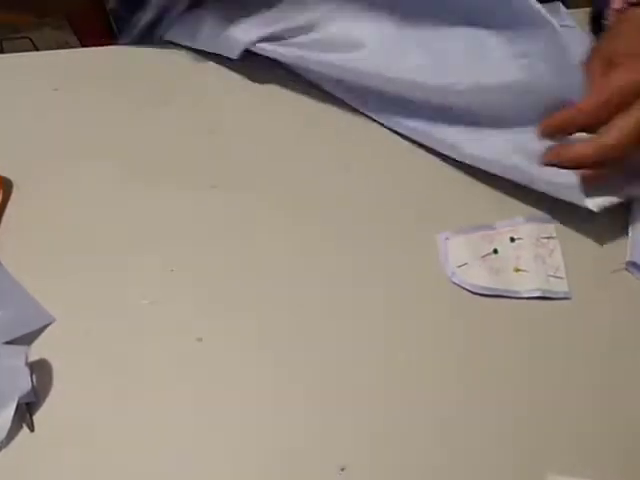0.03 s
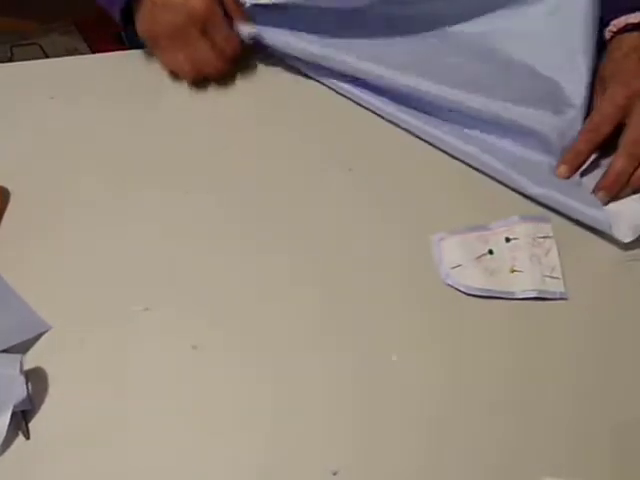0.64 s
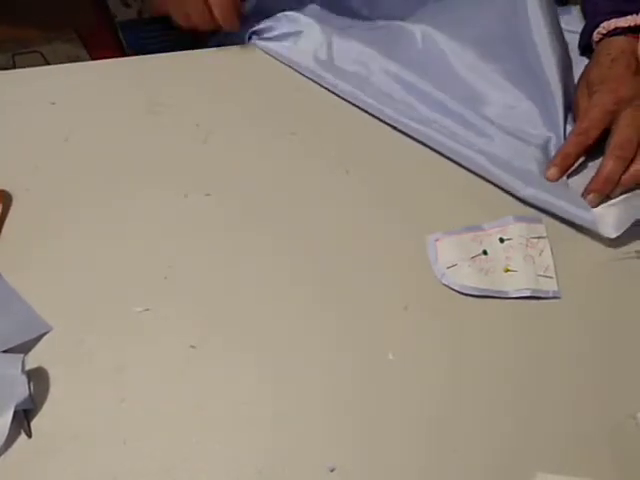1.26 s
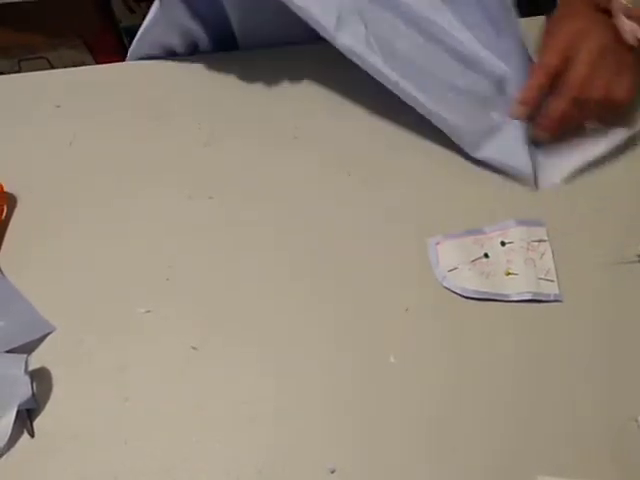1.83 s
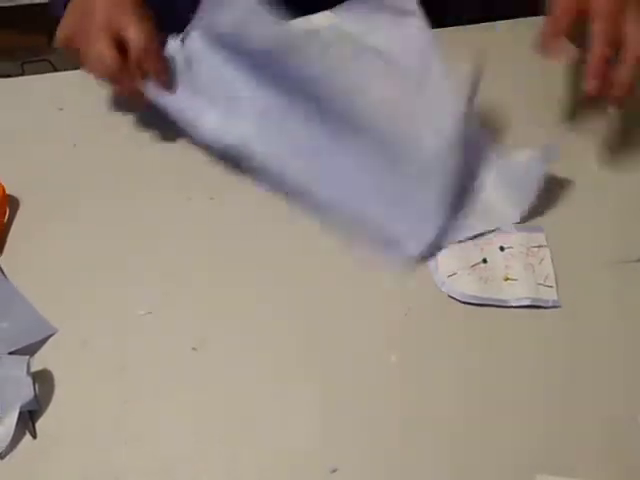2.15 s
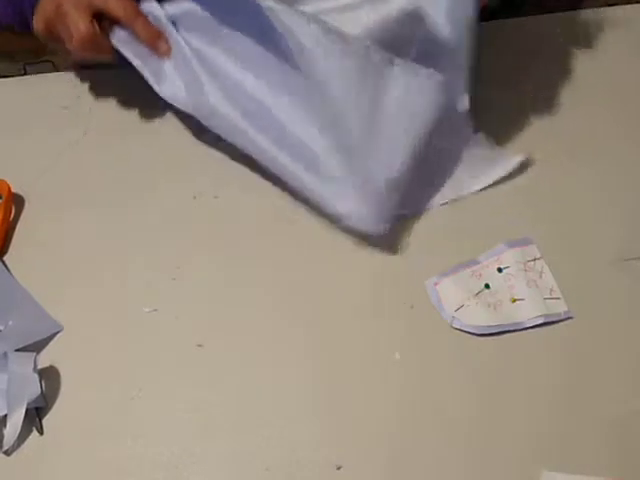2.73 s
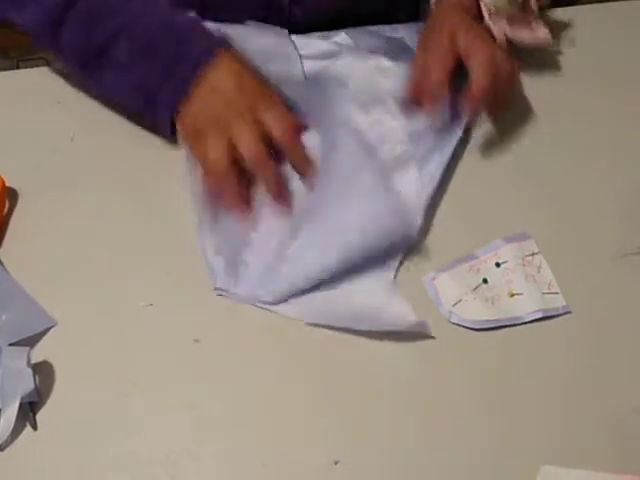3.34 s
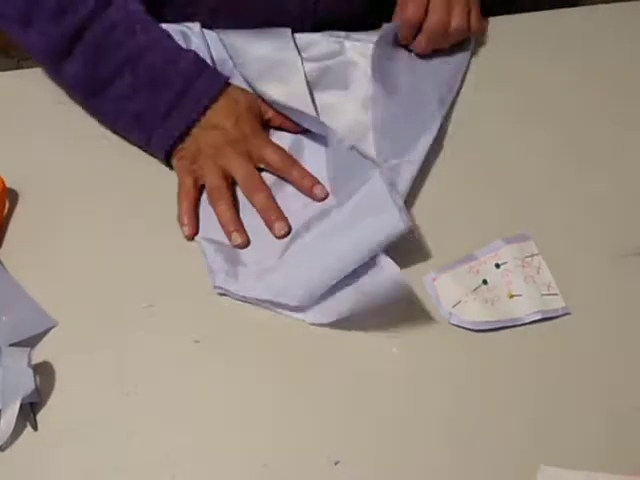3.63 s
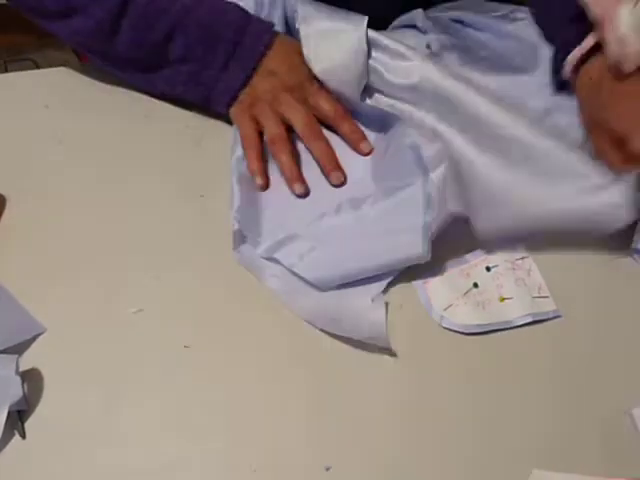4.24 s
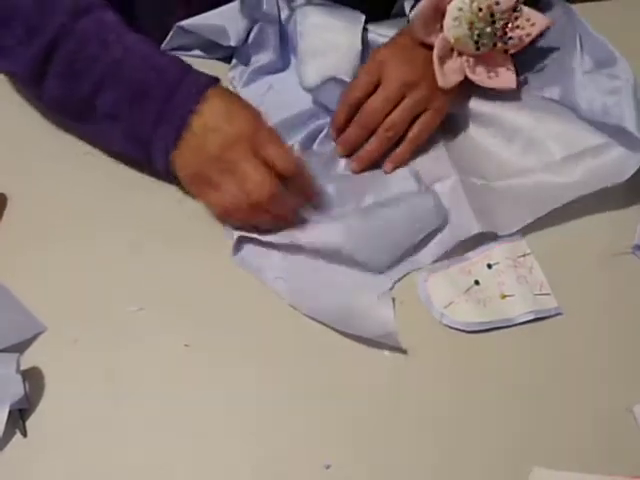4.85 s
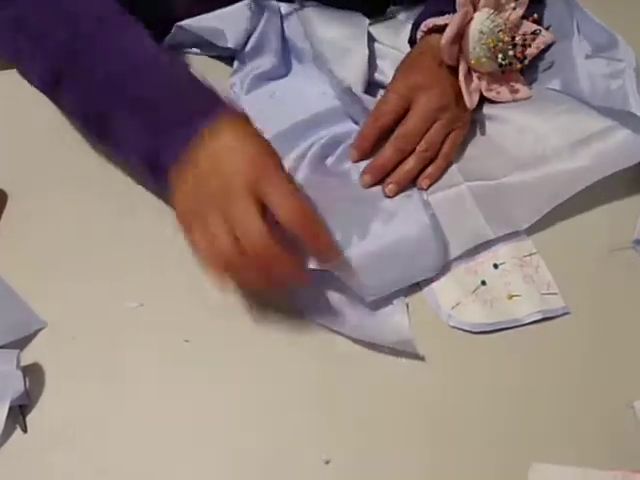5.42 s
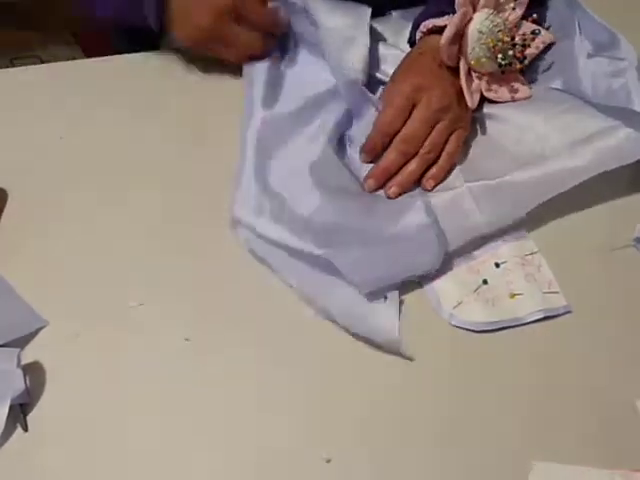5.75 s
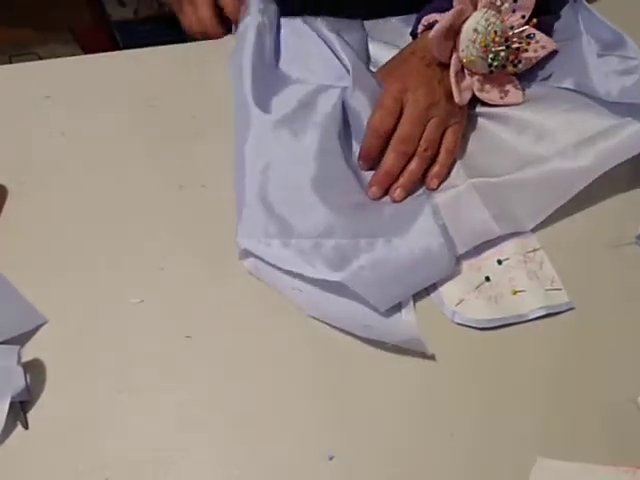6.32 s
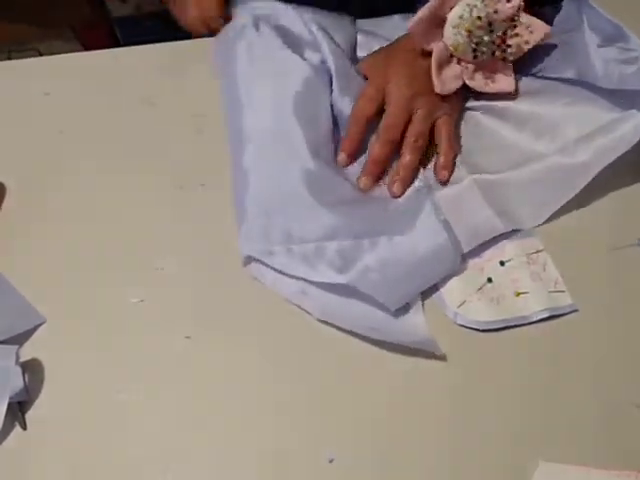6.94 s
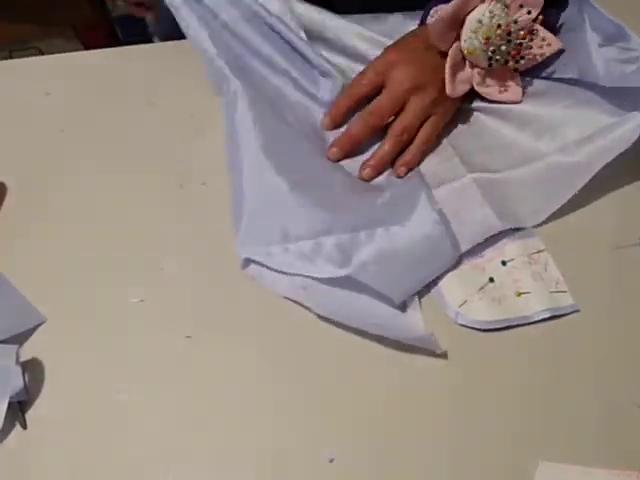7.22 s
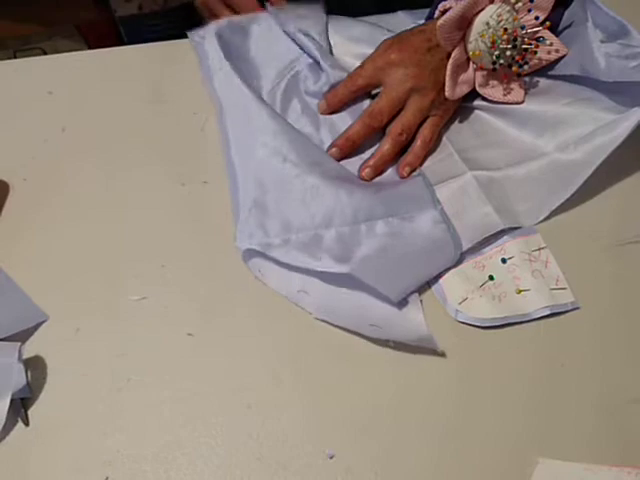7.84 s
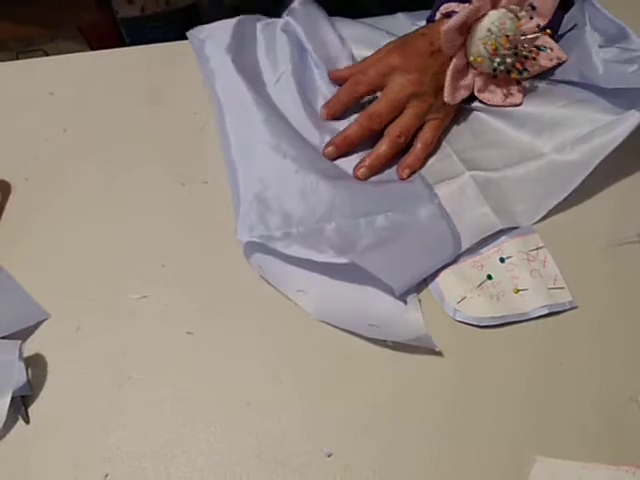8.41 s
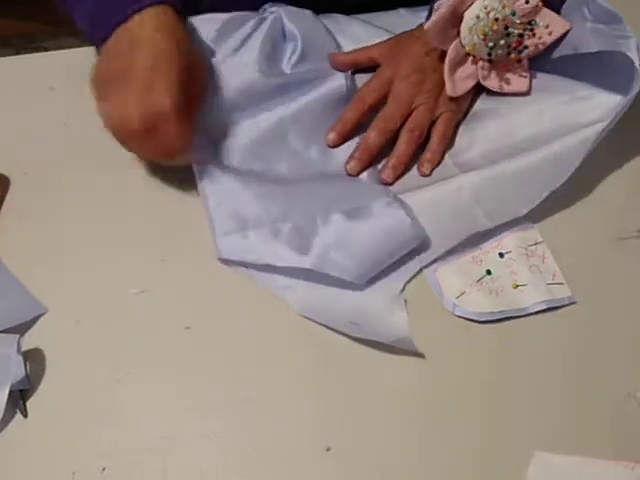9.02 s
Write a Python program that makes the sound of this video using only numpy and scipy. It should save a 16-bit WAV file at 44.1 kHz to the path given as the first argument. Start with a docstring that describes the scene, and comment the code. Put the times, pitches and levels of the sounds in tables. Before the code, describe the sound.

Close stereo microphones in a small, softly rumbling room pick up hands working thin satin on a table. Uneven swells of rustling, hissing and low rubbing run throughout. Early on, fingers knock the table and the cloth snaps crisply several times. Then flat hands thud down and a palm judders across the fabric. Further smoothing strokes follow, with lighter knocks, brief scrapes, tiny ticks and one more snap near the end.

```python
"""Thin satin is lifted, spread and smoothed by hand on a work table, over a small room's low rumble.
From the start, folds rustle, the sliding weave hisses and hands rub. Within a second, folds snap taut,
fingers knock the table into a brief ring, hollow scrapes pass and a flat hand thuds. From 1.4 s a caught
thread ticks now and then, and near 4.6 s a dragged palm judders. Strokes, snaps and knocks go on until
the end at 9 s. Two small microphones close by pick it all up."""
import sys
import numpy as np
from scipy import signal
from scipy.fft import rfft, irfft
from scipy.io import wavfile
from scipy.ndimage import uniform_filter1d

SR = 44100
rng = np.random.default_rng(int(sys.argv[2]) if len(sys.argv) > 2 else 0)


def transcribe(u):
    """Save the signal u as a 16-bit wav file named by the first command-line argument.

    u: samples, shape (n,) or (channels, n), limited to [-1, 1]; the rate is SR.
    q: integer samples, one column per channel.
    """
    v = np.clip(np.atleast_2d(u).T, -1, 1)
    q = np.round(v * 32767).astype(np.int16)
    wavfile.write(sys.argv[1], SR, q)


N = 399987
HZ = np.fft.rfftfreq(N, 1 / SR)
TIME = np.arange(N) / SR


def gain(db):
    """Turns decibels into a factor to multiply a sound by."""
    return 10 ** (np.asarray(db) / 20)


def evened(x):
    """Scales a signal to an average strength (rms) of 1."""
    return x / np.sqrt(np.mean(x ** 2) + 1e-20)


def look_up(points, hz):
    """Reads between the rows of a table, on a logarithmic frequency scale."""
    f, value = np.transpose(points)
    return np.interp(np.log(hz + 1), np.log(f + 1), value)


def add(mix, start, sound):
    """Mixes a sound in at a start time in seconds."""
    part = mix[..., max(round(start * SR), 0):][..., :sound.shape[-1]]
    part += sound[..., :part.shape[-1]]


def coloured(x, colour):
    """Gives a signal a colour (its mix of low and high), at strength 1."""
    return evened(irfft(rfft(x) * gain(look_up(colour, HZ)), N))


def noise(colour):
    """Steady noise of one colour, as a front and a side part."""
    return coloured(rng.standard_normal((2, N)), colour)


def pulse(hz, cycles):
    """A push that swells for the given number of cycles, then dies away."""
    age = np.arange(SR // 4) / SR * hz / cycles
    return age * np.exp(1 - age) * np.sin(2 * np.pi * age * cycles)


def scattered(sound, scatter_db, fade_s, side_db):
    """A blow bounces off nearby things; gives a front and a side part."""
    t = np.arange(SR // 4) / SR
    echo = rng.standard_normal((2, len(t))) * gain(-60 * t / fade_s) * (t > .0015)
    echo *= gain(scatter_db) / np.linalg.norm(echo[0])
    echo[0, 0] += 1  # the direct sound
    echo[1, round(.0012 * SR)] += gain(side_db)  # first bounce from the side
    return signal.fftconvolve(sound[None], echo, axes=1)


# How long the walls echo: f/Hz, time to fade by 60 dB/s
WALL_ECHO = [(100, 0.33), (400, 0.2), (1500, 0.28), (4000, 0.082), (12000, 0.28)]

def with_walls(x, echo_db):
    """Adds the short echo of the walls."""
    hz, t, bands = signal.stft(rng.standard_normal((2, SR // 2)), SR, nperseg=256)
    fade = gain(-60 * t / look_up(WALL_ECHO, hz)[:, None]) * (t > .01)
    tail = signal.istft(bands * fade, SR, nperseg=256)[1]
    tail /= np.linalg.norm(tail[0])
    return x + gain(echo_db) * signal.fftconvolve(x, tail, axes=1)[:, :N]


# Colour of the still room: f/Hz, level/dB (levels in all tables are relative)
RUMBLE_COLOUR = [(20, -32), (55, 5), (130, 2), (260, -8), (480, -11), (900, -14), (1800, -17),
                 (2550, -14.5), (3400, -24), (5200, -26), (6500, -28), (14000, -30)]

def room_rumble():
    """The still room rumbles softly and steadily."""
    return gain(-61.5) * noise(RUMBLE_COLOUR)


# Pulls and sweeps, at their fastest: t/s, swell/s, fade/s, rub level/dB, fold level/dB, weave level/dB
CLOTH_STROKES = [(0.0, .1, 0.2, -60, -53.5, -76), (0.23, 0.22, .11, -74, -51, -57),
                 (0.61, .11, 0.29, -45, -50.5, -57.5), (0.8, 0.15, 0.16, -71, -58, -75),
                 (0.97, 0.035, 0.069, -50, -52, -63), (1.115, 0.072, 0.083, -51.5, -47, -48.5),
                 (1.52, 0.08, 0.15, -49.5, -48.5, -52.5), (1.65, .1, 0.14, -47, -42.5, -50.5),
                 (2.0, 0.077, 0.067, -55, -55, -60), (2.12, 0.1, 0.19, -58.5, -55.5, -61.5),
                 (2.35, .06, 0.077, -43.5, -44, -55), (2.63, 0.2, 0.12, -54, -48.5, -55.5),
                 (3.0, 0.059, 0.064, -58, -46, -55.5), (3.21, 0.069, 0.06, -50, -51, -62),
                 (3.315, 0.052, 0.036, -40.5, -43.5, -56), (3.42, 0.16, 0.047, -52, -48, -57.5),
                 (3.61, 0.081, .035, -45.5, -42.5, -51.5), (3.9, 0.19, 0.36, -55, -50, -58),
                 (4.07, 0.2, 0.15, -55, -45.5, -52), (4.595, .11, 0.16, -50.5, -45, -53.5),
                 (4.835, 0.042, 0.034, -74, -50.5, -54.5), (5.0, .1, 0.042, -59, -55.5, -60.5),
                 (5.185, 0.099, 0.11, -53, -53, -57.5), (5.386, 0.085, 0.033, -75, -55, -56.5),
                 (5.725, 0.023, .07, -57, -51, -65), (5.89, .1, .07, -60, -48.5, -57),
                 (6.29, .25, 0.15, -58.5, -53.5, -62), (6.53, 0.086, 0.05, -45.5, -47.5, -53),
                 (6.72, 0.059, 0.16, -51, -54.5, -64.5), (6.95, 0.052, 0.17, -62, -53, -64),
                 (7.21, 0.22, 0.086, -51.5, -48.5, -57), (7.37, 0.061, 0.092, -50.5, -50, -53.5),
                 (7.73, 0.11, .09, -58, -57.5, -66), (8.025, 0.1, 0.057, -53, -50.5, -56.5),
                 (8.135, 0.032, .035, -72, -54, -57), (8.225, 0.065, 0.091, -53, -51, -56.5),
                 (8.41, 0.051, .11, -57, -54.5, -62), (8.66, 0.031, 0.11, -55.5, -52, -62.5),
                 (8.831, 0.09, 0.058, -54.5, -50, -52.5), (8.955, 0.041, 0.086, -47, -49, -56.5)]
# The held cloth keeps stirring between strokes, less once it lies flat: t/s, level/dB
CLOTH_STIRRING = [(0, -57), (1.0, -56.5), (1.38, -61.5), (1.85, -54), (2.24, -60.5), (2.9, -52.5),
                  (3.7, -65.5), (4.4, -53), (5.0, -62.5), (5.5, -68), (6.1, -57.5), (6.85, -66.5),
                  (7.6, -65), (9.07, -65.5)]

def strokes(part, stir_db):
    """Loudness over time: each stroke speeds up and slows down, on top of the stirring."""
    column = ["rub", "folds", "weave"].index(part)
    drop_db, roundness = 11, 1.56  # drop one swell or fade from the top; 1 = pointed, 2 = bell
    power = gain(np.interp(TIME, *np.transpose(CLOTH_STIRRING)) + stir_db) ** 2
    for peak, swell, fade, *levels_db in CLOTH_STROKES:
        near = slice(*np.searchsorted(TIME, [peak - 3 * swell, peak + 3 * fade]))
        away = np.maximum((peak - TIME[near]) / swell, (TIME[near] - peak) / fade)
        power[near] += gain(levels_db[column] - drop_db * away ** roundness) ** 2
    return np.sqrt(power)


def pockets(x, depth_db):
    """Pockets in the moving cloth open and close, so hollow tones come and go."""
    bands = signal.stft(x, nperseg=1024, noverlap=768)[2]
    patches = rng.standard_normal(bands.shape[1:])
    for _ in range(2):
        patches = uniform_filter1d(patches, size=4, axis=0)  # smooth over pitch
        patches = uniform_filter1d(patches, size=8, axis=1)  # and over time
    return signal.istft(bands * gain(depth_db * evened(patches)), nperseg=1024, noverlap=768)[1][:, :N]


def friction(colour, flutter_db, flutter_hz, slips_per_s, spread_db, slip_share, pocket_db):
    """Threads catch and let go: countless tiny slips blur into a hiss, with larger ones among them."""
    sizes = gain(spread_db * np.minimum(rng.exponential(1, N), 4))
    slipping = rng.random(N) < slips_per_s / SR
    slips = evened(sizes * slipping * rng.choice([-1., 1.], (2, N)))
    hiss = rng.standard_normal((2, N))
    sliding = pockets(np.sqrt(1 - slip_share) * hiss + np.sqrt(slip_share) * slips, pocket_db)
    slow_band = HZ / flutter_hz / (1 + (HZ / flutter_hz) ** 4)
    flutter = evened(irfft(rfft(rng.standard_normal(N)) * slow_band, N))  # the level wavers by chance
    return coloured(sliding * gain(flutter_db * flutter), colour)


# Colour of rustling folds: f/Hz, level/dB
FOLD_COLOUR = [(250, -16), (550, -7.5), (800, 0), (1350, -3), (1800, -4), (2150, -3), (2500, 1.5),
               (2800, -3.5), (3300, -14), (4200, -12), (6500, -32)]

def fold_rustle():
    """Moving folds rustle in the middle range."""
    rustle = friction(FOLD_COLOUR, flutter_db=1, flutter_hz=26.8,
                      slips_per_s=700, spread_db=3, slip_share=0.25, pocket_db=2.5)
    return gain(-0.5) * strokes("folds", stir_db=0) * rustle


# Colour of the sliding weave: f/Hz, level/dB
WEAVE_COLOUR = [(1800, -10), (3400, 4.5), (4100, -5), (5200, 0.5), (6400, 3), (7400, 2), (8500, -2),
                (10500, 1), (14000, -4)]

def weave_hiss():
    """The smooth weave slides with a high hiss."""
    hiss = friction(WEAVE_COLOUR, flutter_db=1, flutter_hz=13.4,
                    slips_per_s=900, spread_db=3.8, slip_share=0.15, pocket_db=2)
    return gain(0.37) * strokes("weave", stir_db=-7) * hiss


# The table top's own tones: f/Hz, level/dB, time to fade by 60 dB/s
TABLE_TONES = [(136.5, -9, 0.21), (171.5, -12, 0.17), (198.6, -0.5, 0.24), (245, -8, .1), (320, -27, 0.073),
               (344.4, 1.5, 0.23), (385, -14, 0.079), (470.5, 2.5, 0.088), (518, 0.5, 0.094),
               (714, -2, 0.065), (776, -24, 0.11)]

def table_top(force):
    """A push sets the table top ringing briefly at its own tones."""
    t = np.arange(SR // 2) / SR
    ring = sum(gain(db - 60 * t / fade) * np.cos(2 * np.pi * hz * t) for hz, db, fade in TABLE_TONES)
    return signal.fftconvolve(force, ring[None] / abs(rfft(ring)).max(), axes=1)[:, :N]


# Colour of rubbing hands: f/Hz, level/dB
RUB_COLOUR = [(35, -12), (65, -10.5), (140, 4), (200, -1.5), (280, 1), (350, 0), (460, -5.5), (620, -8),
              (900, -24), (1600, -55)]

def hand_rubbing():
    """Hands slide heavily on the cloth and make the table murmur."""
    rub = friction(RUB_COLOUR, flutter_db=2, flutter_hz=23.3,
                   slips_per_s=120, spread_db=3.5, slip_share=0.26, pocket_db=3)
    rub *= strokes("rub", stir_db=-4.5)
    return gain(-3) * rub + table_top(rub)


# Folds snapping taut or flipping over: t/s, level/dB, f/Hz, swish length/s, added swish level/dB
FOLD_SNAPS = [(0.2205, -43.5, 2830, 0.018, 2.5), (0.506, -36, 2580, 0.009, -35),
              (0.554, -24, 2650, 0.028, -15.5), (0.571, -27.5, 2620, 0.03, -12.5),
              (1.417, -27.5, 1120, 0.037, -11), (2.019, -45, 1710, 0.0086, -10),
              (2.28, -32, 3040, 0.0089, -13), (2.291, -18, 2850, 0.025, -19),
              (2.995, -34.5, 1070, .012, -20), (3.137, -35.5, 2460, 0.014, -11),
              (3.282, -38, 2480, 0.01, -14), (3.319, -28, 2470, 0.0059, -25),
              (5.377, -38, 2850, 0.016, -22), (5.706, -43, 910, 0.043, -15), (6.499, -33, 940, 0.042, -19),
              (6.876, -49, 1300, 0.016, -17), (7.215, -29, 1190, 0.016, -18),
              (8.605, -40, 2670, 0.02, -7.5), (8.951, -29, 2770, 0.018, -28)]

def fold_snaps():
    """A fold pops and cracks, then the freed cloth swishes and comes to rest."""
    pops, swish_level = np.zeros((2, N)), np.zeros(N)
    t = np.arange(SR // 3) / SR
    for start, db, hz, length, swish_db in FOLD_SNAPS:
        pop = pulse(hz, cycles=(hz / 1200) ** 0.72)
        crack = gain(-4) * pulse(6100, cycles=0.51)
        add(pops, start, gain(db) * scattered(pop + crack, scatter_db=-4.5, fade_s=0.074, side_db=1))
        rise_and_fall = (1 - np.exp(-t / 0.0011)) * np.exp(-t / length)
        add(swish_level, start, gain(db + swish_db) * rise_and_fall)
    swish = noise(FOLD_COLOUR) + gain(-12.5) * noise(WEAVE_COLOUR)
    return gain(-2) * with_walls(pops, echo_db=-10.5) + gain(1.5) * swish_level * swish


# Fingers and knuckles landing on the table: t/s, level/dB, f/Hz, sharpness/dB
FINGER_KNOCKS = [(0.224, -25, 365, -13), (0.229, -20.5, 416, -6), (0.242, -16, 377, -3.5),
                 (0.256, -26, 273, -18), (0.263, -27.5, 298, -13), (0.297, -36.5, 167, -16),
                 (0.556, -28, 232, 0.5), (0.57, -27, 210, 4.5), (0.582, -25.5, 347, 0),
                 (0.724, -39, 333, -8), (0.794, -40, 230, -8), (1.421, -31, 400, -14),
                 (1.433, -33, 201, -2), (1.464, -36.5, 330, -20), (2.28, -34, 200, -25),
                 (2.297, -35.5, 300, -22), (2.36, -36, 380, -21), (3.133, -34.5, 220, -7),
                 (3.321, -33.5, 376, -24), (3.394, -34.5, 191, -21), (3.535, -34, 214, -20),
                 (3.558, -25, 270, -12), (3.601, -36.5, 340, 8), (3.886, -39.5, 179, -19),
                 (4.664, -30, 209, -1), (5.179, -38.5, 288, -22), (6.497, -47, 350, -10),
                 (7.517, -38, 202, -18), (8.029, -42, 211, -15), (8.607, -38, 353, -6),
                 (8.63, -35.5, 247, -5), (8.845, -39.5, 256, -9), (8.942, -37.5, 254, -4),
                 (8.977, -38, 256, 4)]

def finger_knocks():
    """Each finger gives a padded push and a small tap, and sets the table ringing."""
    force = np.zeros((2, N))
    for start, db, hz, sharp_db in FINGER_KNOCKS:
        push = pulse(hz, cycles=0.42)
        tap = gain(sharp_db - 1.5) * pulse(762, cycles=0.51)
        add(force, start, gain(db) * scattered(push + tap, scatter_db=1, fade_s=0.13, side_db=-16))
    return gain(-2.5) * with_walls(force + gain(6) * table_top(force), echo_db=-11)


# Hollow scrapes, and the brief narrow ring of folds snapping taut, at their loudest:
# t/s, length/s, level/dB, f/Hz, band width/Hz
SCRAPES_AND_RINGS = [(0.322, 0.027, -45.5, 1280, 350), (0.558, 0.007, -31, 2690, 250),
                     (0.575, 0.02, -33, 2700, 300), (0.84, 0.025, -47.5, 736, 150),
                     (1.66, 0.022, -43.5, 965, 450), (2.294, 0.0063, -32, 3300, 800),
                     (2.311, 0.024, -35, 2790, 400), (2.608, 0.11, -49, 1380, 350),
                     (3.212, 0.027, -48, 1900, 400), (3.307, .04, -45.5, 2640, 500),
                     (5.161, 0.07, -45, 2750, 330), (5.344, 0.079, -55, 1410, 350),
                     (5.387, 0.035, -55, 7600, 900), (6.235, 0.037, -49, 405, 253),
                     (6.35, 0.023, -49, 654, 250), (6.988, .04, -54, 840, 250),
                     (8.644, 0.026, -48.5, 586, 500), (8.953, 0.017, -37, 2730, 260)]

def scrapes_and_rings():
    """Each hollow scrape or ring of a snapping fold is a narrow band of noise that swells and fades."""
    out = np.zeros((2, N))
    t = np.arange(SR // 2) / SR
    f = np.fft.rfftfreq(len(t), 1 / SR)
    for middle, length, db, hz, width in SCRAPES_AND_RINGS:
        band = 1 / (1 + (2 * (f - hz) / width) ** 2)
        tone = irfft(rfft(rng.standard_normal((2, len(t)))) * band, len(t))
        swell = np.exp(-2 * ((t - t.mean()) / length) ** 2)
        add(out, middle - t.mean(), gain(db) * evened(tone) * swell)
    return gain(-3) * with_walls(out, echo_db=-11)


# A flat hand pressing down: t/s, level/dB, f/Hz
HAND_THUDS = [(0.571, -55, 107), (1.433, -52, 48.4), (2.28, -53, 109), (3.396, -38, 67.5), (3.557, -48, 57),
              (4.666, -39.5, 75.6), (4.96, -44, 77), (5.18, -59.5, 94), (8.209, -47.5, 108),
              (8.87, -53, 81)]

def hand_thuds():
    """The whole table gives a little under a flat hand and sways for a few cycles."""
    out = np.zeros((2, N))
    for start, db, hz in HAND_THUDS:
        sway = pulse(hz, cycles=0.83) + gain(-5.5) * pulse(hz * 1.85, cycles=1.86)
        add(out, start, gain(db) * scattered(sway, scatter_db=-4.5, fade_s=0.23, side_db=-31))
    return gain(4) * out


# Threads catching on skin: t/s, level/dB
THREAD_TICKS = [(1.4162, -46), (2.2907, -38), (4.2896, -47), (5.8202, -46), (8.1304, -44), (8.287, -41.5)]

def thread_ticks():
    """A caught thread lets go with a very short, bright tick."""
    out = np.zeros((2, N))
    tick = pulse(10200, cycles=0.9)
    for start, db in THREAD_TICKS:
        add(out, start, gain(db) * scattered(tick, scatter_db=4, fade_s=0.05, side_db=-2))
    return gain(2) * out


# A palm dragged over the cloth: t/s, level/dB
PALM_DRAG = [(4.52, -70), (4.555, -45.5), (4.605, -38), (4.655, -49), (4.69, -48)]

def palm_drag():
    """A dragged palm judders and shakes the table top."""
    judder = noise([(200, -25.5), (340, 3.5), (540, -0.5), (900, -9)])  # f/Hz, level/dB
    level_db = np.interp(TIME, *np.transpose(PALM_DRAG), left=-120, right=-120)
    return gain(level_db + 3) * evened(table_top(judder))


# How alike left and right are: f/Hz, likeness (held within -0.99, opposite, and 0.99, alike)
STEREO_LIKENESS = [(60, -0.5), (125, -0.45), (200, 0.6), (560, 0.6), (850, 1), (1200, 1.4), (1600, 0.4),
                   (2150, 0.97), (2850, 0.37), (3200, 1.1), (3650, 0), (4250, 1.15), (4700, 0.4),
                   (5200, 0.43), (8000, 0.24), (14000, 0.1)]
# How far the left wave runs ahead of the right: f/Hz, lead/radians
LEFT_LEAD = [(0, 0), (1380, 0), (1750, 2.3), (2100, 3.14), (2600, 4.4), (3050, 6.1), (3450, 6.3),
             (3850, 9.2), (4550, 9.5), (4900, 12.4), (5450, 12.6), (6100, 15.3), (7400, 18.8), (14000, 36)]
# How much louder the left is than the right: f/Hz, level/dB
LEFT_LOUDER = [(100, -0.5), (450, 3), (1200, -0.5), (1900, 2), (4800, 0), (6400, 3), (14000, 0.5)]

def stereo(sound):
    """The recorder's stereo processing makes left and right, with the treble earlier on the left."""
    front, side = rfft(sound)
    likeness = np.clip(look_up(STEREO_LIKENESS, HZ), -.99, .99)
    front *= np.sqrt((1 + likeness) / 2)
    side *= np.sqrt((1 - likeness) / 2)
    lean_left = gain(look_up(LEFT_LOUDER, HZ) / 2) * np.exp(.5j * look_up(LEFT_LEAD, HZ))
    return irfft(np.array([(front + side) * lean_left, (front - side) / lean_left]), N)


def scene():
    """The room, the cloth and the hands together, in stereo."""
    mix = room_rumble() + fold_rustle() + weave_hiss() + scrapes_and_rings()
    mix += hand_rubbing() + palm_drag()
    mix += finger_knocks() + hand_thuds() + fold_snaps() + thread_ticks()
    return stereo(mix)


def record(dry):
    """The small microphones lose the deepest bass, and the recorder the highest treble."""
    bass_cut = signal.butter(4, 35, "highpass", fs=SR, output="sos")  # below 35 Hz
    treble_cut = signal.firwin(511, 14420, window=("kaiser", 9), fs=SR)  # above 14420 Hz
    return signal.oaconvolve(signal.sosfilt(bass_cut, dry), treble_cut[None], "same")


dry = scene()
out = record(dry)
transcribe(out)
```